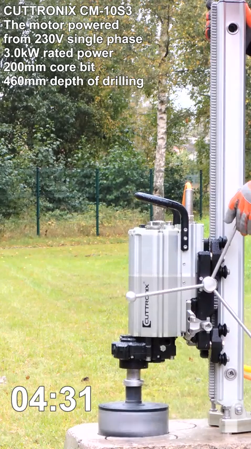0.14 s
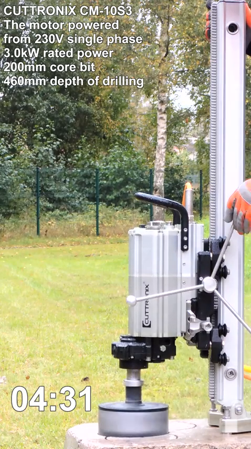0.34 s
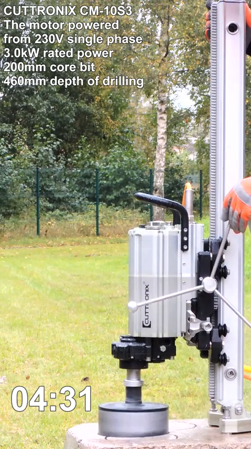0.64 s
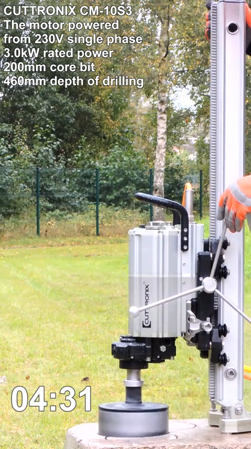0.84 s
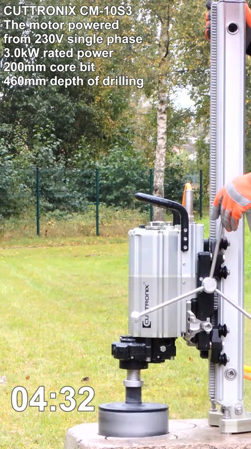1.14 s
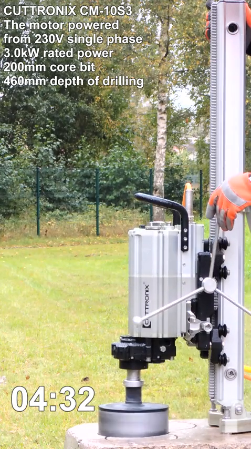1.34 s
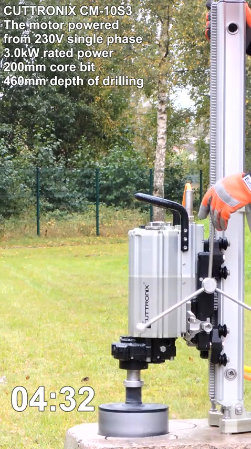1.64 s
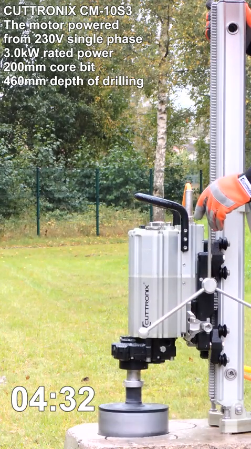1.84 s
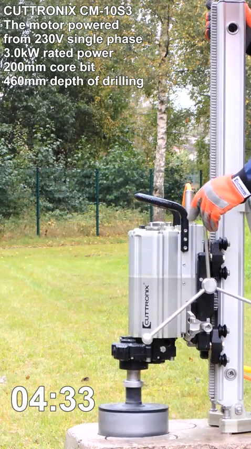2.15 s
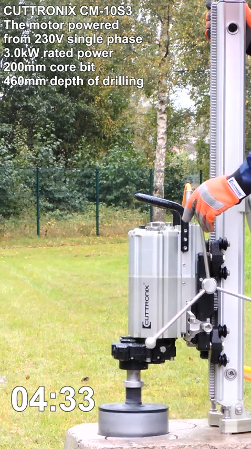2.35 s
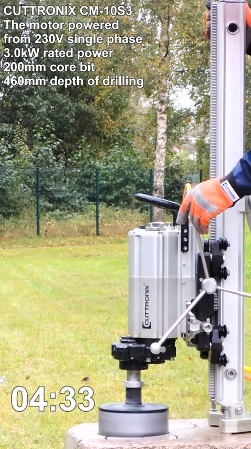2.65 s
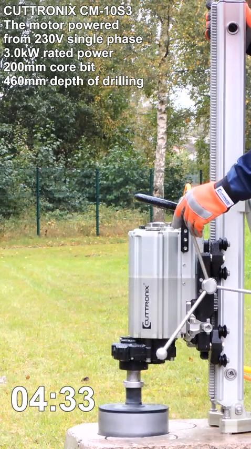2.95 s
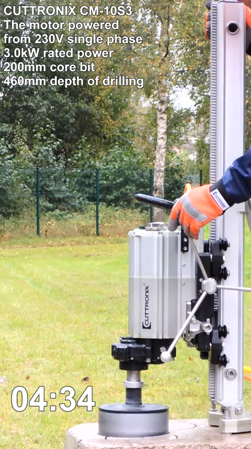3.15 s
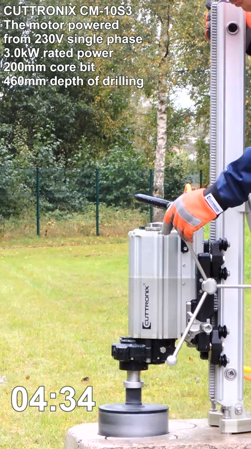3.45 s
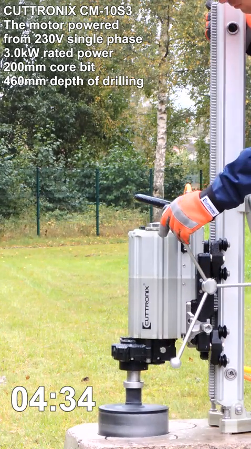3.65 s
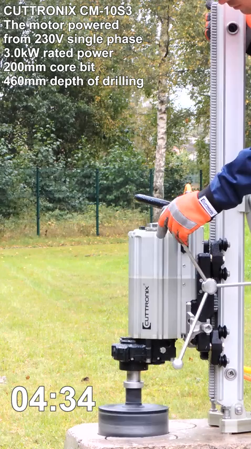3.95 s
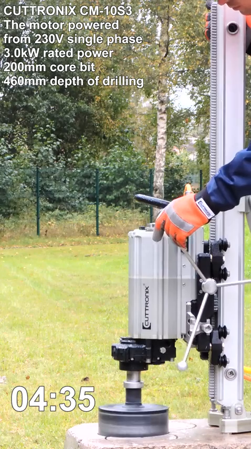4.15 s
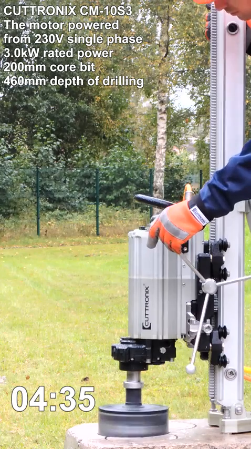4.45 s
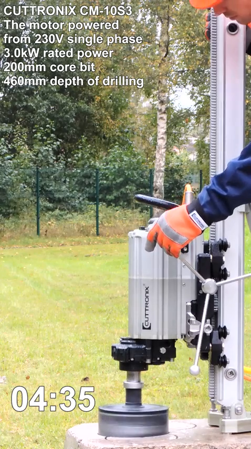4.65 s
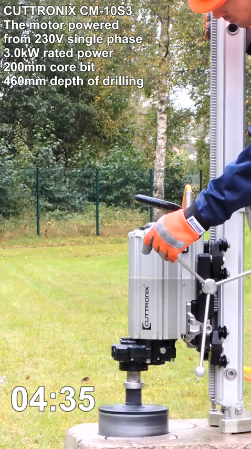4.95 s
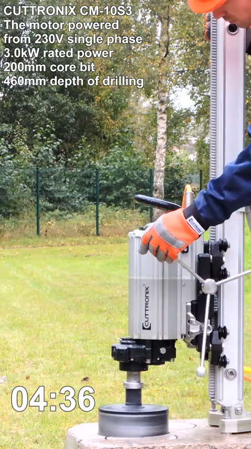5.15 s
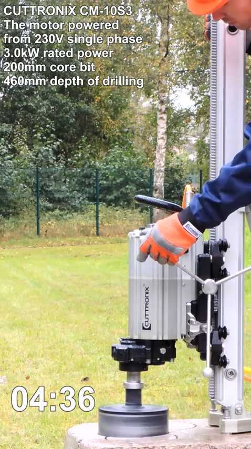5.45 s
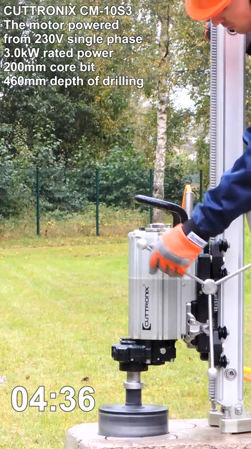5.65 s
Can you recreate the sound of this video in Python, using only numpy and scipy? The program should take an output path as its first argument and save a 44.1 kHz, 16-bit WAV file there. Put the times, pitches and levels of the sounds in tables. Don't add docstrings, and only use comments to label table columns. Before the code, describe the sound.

From 0 to about 5.8 seconds an electric core drill grinds concrete without pause, starting and ending mid-cut. The main sound is a dense, abrasive scrape: bright hissing grit over a hollow, metallic midrange and modest low rumble. It flutters about ten times a second with each barrel turn, the lower roughness partly repeating. A thin whine near 1.4 kHz, with close companion tones and faint gear whistles, rises slightly until about 1.6 s, sags by 3.5 s, then climbs to the end. Small rasps catch around 0.6 to 0.9 s, the sharpest at 0.8; the grinding eases briefly near 2 s. Scattered scratches and dull knocks follow at 2.3, 2.6, 3.2 and 4.8 s. From 5.3 to 5.6 s a quick cluster of woody, stony knocks rattles the rig, around a brighter surge at 5.45. Close, dry, outdoors, centered with slight treble width.

```python
import sys
import numpy as np
from scipy import signal
from scipy.fft import rfft, irfft
from scipy.io import wavfile
from scipy.ndimage import uniform_filter1d

SR = 44100
rng = np.random.default_rng(int(sys.argv[2]) if len(sys.argv) > 2 else 0)


def wav_out(sig):
    wavfile.write(sys.argv[1], SR, np.round(np.clip(np.atleast_2d(sig).T, -1, 1) * 32767).astype(np.int16))


def magnitude_from_level(level_db):
    exponent = np.asarray(level_db, float) / 20
    return 10 ** exponent


N = 256220
HOP = 128

# (frequency [Hz], level [dB per Hz])
SCRATCH_SPECTRUM = [(20, -22), (60, -24.5), (110, -21), (170, -20.5), (330, -18.5), (570, -22.5),
                    (800, -10.5), (1300, -7.5), (1800, -14), (2300, -12.5), (3300, -9.5), (6100, -4),
                    (9000, -1.38), (12000, -3)]
# (frequency [Hz], width [Hz], gain [dB])
RIG_RESONANCES = [(129, 35, 7), (162, 25, -3), (220, 105, 11.5), (310, 50, -3), (358, 18, -5),
                  (458, 216, 15.5), (594, 59, -7.5), (603, 30, 12.5), (679, 25, 3), (935, 60, -2),
                  (1022, 130, 6), (1333, 31, -4), (1490, 130, -3.5), (1640, 165, 11), (1997, 299, 8.7),
                  (2420, 173, 6.3), (2891, 600, 10.2), (3756, 270, 7.5), (4483, 560, 3.6),
                  (5406, 1188, 4.4), (6143, 268, -3.2), (6762, 75, 2.1), (7794, 429, 4.3),
                  (7813, 199, -5.8), (8190, 114, -2.6), (8617, 83, -2.1), (9812, 112, 2.8),
                  (10234, 276, 2.6), (10578, 128, 4), (1170, 70, 1), (1790, 60, -1.5), (3130, 70, 1.2),
                  (3290, 80, -2), (3420, 120, 1.2), (4030, 110, 2.2), (4720, 150, -1), (5000, 150, -1),
                  (5650, 70, 1.5), (6570, 110, 1.6), (6930, 130, -1.6), (11144, 787, 2.7), (11604, 90, 3.6)]
# (frequency [Hz], share [0-1])
TURN_REPEAT = [(80, .2), (150, .4), (280, .55), (390, .3), (550, .45), (900, .1), (1050, .2), (1500, .04),
               (2000, 0)]
# (frequency [Hz], level [dB])
PORT_DIFFERENCE = [(30, -9), (110, -16.5), (300, -29), (800, -31.5), (1150, -36), (1500, -25), (1800, -38),
                   (5000, -32), (5700, -64), (6300, -14.5), (8000, -13.5), (12000, -14.5)]
# (frequency [Hz], in step [ratio], quarter cycle late [ratio])
PORT_LEAN = [(60, -0.07, 0.032), (250, -0.015, 0.025), (6000, 0.0022, -0.0067), (6600, -.02, -0.17),
             (7600, -.08, -.15), (8300, -.05, -.04), (10200, -.04, -0.13), (11400, -0.061, 0)]


def grinding(t, turns):
    hz = np.fft.rfftfreq(N, 1 / SR)
    share = read(TURN_REPEAT, hz)
    fresh = np.sqrt(1 - share) * rfft(grit(spread_db=1.15))
    returning = np.sqrt(share) * rfft(groove(turns, memory=0.83))
    scrape = irfft(fresh + returning, N)
    side_scrape = grit(spread_db=-0.5)

    stft = dict(nperseg=512, noverlap=512 - HOP)
    band_hz, frame_s, z = signal.stft(np.array([scrape, side_scrape]), SR, **stft)
    z *= magnitude_from_level(loading(band_hz, frame_s, np.interp(frame_s, t, turns)))
    loaded = signal.istft(z, SR, **stft)[1][:, :N]
    total, apart = rfft(loaded)

    lean_hz, in_step, late = np.transpose(PORT_LEAN)
    lean = np.interp(hz, lean_hz, in_step + 1j * late)
    apart = apart * magnitude_from_level(read(PORT_DIFFERENCE, hz)) + total * lean
    colour_db = read(SCRATCH_SPECTRUM, hz)
    for centre_hz, width_hz, gain_db in RIG_RESONANCES:
        colour_db = colour_db + gain_db / (1 + (2 * (hz - centre_hz) / width_hz) ** 2)
    return magnitude_from_level(5.5) * irfft(np.array([total, apart]) * magnitude_from_level(colour_db), N)


def grit(spread_db):
    size_db = spread_db * rng.standard_normal(N // 8 + 1).repeat(8)[:N]
    return evened(rng.standard_normal(N) * magnitude_from_level(size_db))


def groove(turns, memory):
    steps = 2048
    fresh = rng.standard_normal((90, steps))
    rings = signal.lfilter([1], [1, -np.clip(memory, 0, .98)], fresh, axis=0)[20:]
    rough = np.interp(turns * steps, np.arange(rings.size), evened(rings).ravel())
    return rough * np.sqrt(steps * 10 / SR)


# (time [s], level [dB])
FEED_FORCE = [(0.0, -18), (0.11, -18.5), (0.52, -21), (0.605, -18), (0.625, -19.5), (0.71, -18),
              (0.74, -18.5), (1.7, -17.5), (1.72, -17.5), (1.97, -22), (2.12, -19), (3.67, -20),
              (3.72, -17), (3.88, -18.5), (4.51, -17), (5.31, -21), (5.42, -18), (5.81, -19)]
# (frequency [Hz], share [0-1])
FEED_REACH = [(300, 0.84), (1400, 0.33), (3400, 0.75), (7500, 0.66)]
# (multiple of the turn [1], depth [dB], phase [rad])
BIT_WOBBLE = [(1, 2, 0.8), (2, 0.98, -0.7), (3, 1, 3.5), (4, 1.1, -1)]
# (frequency [Hz], share [0-1])
WOBBLE_REACH = [(200, 0.26), (1500, 0.34), (3000, 0.11), (6000, 0.32), (12000, 0.42)]
# (time [s], level change [dB], length [s])
STONE_BITES = [(0.107, 1.5, 0.036), (0.713, 2, 0.037), (0.864, 1.5, 0.014), (1.748, -2.5, 0.045),
               (1.96, 0, 0.043), (3.59, -0.5, 0.029), (4.738, 1.5, 0.014), (5.02, -1.5, 0.021),
               (5.432, 2, 0.017), (5.455, 2, 0.0057), (5.477, -1, 0.015), (0.56, -0.5, 0.0073),
               (0.591, -3, .003), (0.724, -2, .003), (0.971, -2, .003), (4.784, -2, 0.0044),
               (5.003, -0.5, .005)]
# (time [s], length [s], frequency [Hz], width [Hz], level change
# [dB])
RANGE_SWELLS = [(0.05, 0.039, 1000, 410, 3), (.15, 0.16, 250, 60, -7), (.25, .2, 4000, 900, 0.5),
                (.7, 0.066, 1000, 100, 1), (0.714, .02, 2700, 400, -3), (1.05, 0.15, 250, 60, 1),
                (1.422, 0.18, 470, 100, -3), (1.5, .08, 81, 80.5, -4), (1.85, 0.066, 60, 40, 8),
                (1.853, 0.093, 250, 60, -6), (2.15, .05, 70, 40, -4), (2.152, .05, 6000, 1200, 1.5),
                (2.55, 0.12, 240, 80, -5), (2.9, 0.066, 300, 300, 1.5), (3, 0.16, 1000, 200, 1.5),
                (3.15, 0.11, 130, 40, -6), (3.45, 0.049, 500, 120, 0.5), (3.55, 0.15, 2700, 600, -1),
                (3.6, .08, 80.4, 60, -5), (4.2, .1, 950, 200, 0), (4.62, .05, 120, 40, -10),
                (4.8, .1, 135, 40, 3), (4.75, 0.078, 6200, 1200, -1), (5.05, 0.16, 550, 200, -2),
                (5.25, .08, 65, 40, 4), (5.7, .1, 40, 40, 4), (5.45, 0.07, 2290, 600, 0.5),
                (.4, .4, 474, 60, 3), (.75, .12, 4200, 900, 0), (1.5, 0.18, 1030, 60, 1.5),
                (2.905, 0.14, 1690, 80, 4), (4.15, 0.46, 1250, 89, 3.5), (4.297, 0.11, 3740, 150, 2.5),
                (4.45, 0.35, 1600, 120, 1), (4.738, 0.02, 4570, 300, 2), (5.72, 0.3, 1600, 200, 1.5),
                (5.42, 0.21, 980, 90, 5), (5.448, 0.056, 230, 80, 6), (5.46, 0.043, 500, 120, 0),
                (5.45, 0.033, 6500, 1500, 0),
                (0.76, .3, 720, 50, 2), (2.9, .15, 470, 60, -1), (1.5, 0.061, 4500, 1300, -1),
                   (.73, .1, 1200, 120, -3), (3.12, .12, 1900, 200, -3), (4.4, 0.13, 1400, 230, 0.5),
                   (5.45, .04, 700, 150, -0.5), (4.3, 0.4, 310, 33, 3), (1, .2, 310, 45, 3),
                   (2.65, .12, 12000, 1300, 0), (.1, .12, 5100, 800, -1), (4.2, .12, 400, 35, -2),
                   (.5, .25, 710, 53, -0.5), (2.34, .2, 3300, 500, -0.5), (3.1, 0.13, 430, 37, 0),
                   (5.15, 0.074, 130, 54, -6), (2.1, .08, 81, 44, 2)]
# (frequency [Hz], spread [dB])
CHANCE_FLARES = [(300, .3), (2000, .6), (4000, 1.2), (9000, 1.5)]


def loading(hz, s, turns):
    feed_db = np.interp(s, *np.transpose(FEED_FORCE))
    tilt_db = np.outer(read(FEED_REACH, hz), feed_db - feed_db.mean())
    wobble_db = sum(depth_db * np.cos(2 * np.pi * k * turns + phase + 0.25 * drift(0.24, len(s), HOP))
                    for k, depth_db, phase in BIT_WOBBLE)
    bites_db = sum(extra_db * bell(s, at, length) for at, extra_db, length in STONE_BITES)
    swells_db = sum(extra_db * np.outer(bell(hz, centre_hz, width_hz), bell(s, at, length))
                    for at, length, centre_hz, width_hz, extra_db in RANGE_SWELLS)
    flares_db = read(CHANCE_FLARES, hz)[:, None] * patches(tilt_db.shape, bins=2, frames=14)
    chatter_db = 0.68 * patches(tilt_db.shape, bins=12, frames=8)
    chatter_db += 0.71 * patches(tilt_db.shape, bins=45, frames=2)
    steady_db = feed_db.mean() + tilt_db + bites_db + swells_db + rasps(hz, s)
    return steady_db + read(WOBBLE_REACH, hz)[:, None] * wobble_db + flares_db + chatter_db


# (time [s], level change [dB], centre [Hz], decay [s])
SEGMENT_RASPS = [(.6155, 4, 5450, .015), (.632, 7, 3700, .012), (.695, 5, 4800, .012),
                 (.815, 12, 3280, .01), (.872, 0, 2800, .012), (1.9704, -1, 4270, .015),
                 (2.1655, 2.5, 5600, 0.016), (2.2967, 4, 5290, .012), (2.6454, 6.5, 2990, .012),
                 (2.7661, 1, 2410, .012), (2.92, 5, 3000, .01), (3.0614, 0.5, 5740, .012),
                 (3.3822, -2, 5410, .012), (3.707, 3, 5520, .015), (4.0377, 2, 3730, .012),
                 (4.4473, 4, 5660, .012), (4.789, -1, 3810, 0.011), (5.05, -1, 3800, .012),
                 (5.3428, 6, 2450, .01), (5.3966, 3, 5280, 0.011), (5.444, 0, 1700, .015),
                 (5.454, 3, 3500, 0.0092), (5.675, 1, 4910, .012), (5.7144, 4, 2890, 0.016),
                 (5.7912, -1, 3850, .012)]


def rasps(hz, s):
    rise_s, relative_width = .003, 0.17
    total_db = 0
    for at, extra_db, centre_hz, decay_s in SEGMENT_RASPS:
        rise = np.clip((s - at) / rise_s + 1, 0, 1)
        fall = np.exp(-np.maximum(s - at, 0) / decay_s)
        total_db = total_db + extra_db * np.outer(bell(hz, centre_hz, relative_width * centre_hz), rise * fall)
    return total_db


# (time [s], speed [rev/s])
SPINDLE_SPEED = [(0, 9.675), (.4, 9.7), (.6, 9.8), (1, 9.88), (1.2, 10.044), (1.6, 10.144), (2.2, 10.079),
                 (2.8, 9.895), (3.4, 9.63), (3.6, 9.606), (3.8, 9.656), (4, 9.829), (4.4, 9.901),
                 (4.6, 9.831), (5, 9.849), (5.2, 10.079), (5.4, 10.204), (5.81, 10.294)]


def spindle_rev_s(t):
    return np.interp(t, *np.transpose(SPINDLE_SPEED))


# (level at usual speed [dB rms], gain per 1% sag [dB], slow wavering [dB])
MOTOR_WHINE = [
    (-44.5, .5, 1.2),
    (-46.5, 2.3, 1.2),
    (-47, -.8, 2.5),
]
# (multiple of the turn [1], level at middle depth [dB rms], change as the bit sinks [dB/s])
GEAR_TONES = [(7.8, -68, 0), (13, -61, 0), (20.8, -57.5, 1), (24, -56.5, .7), (25, -57, -1.4),
              (26, -54.5, .5), (28, -50.5, 0), (35, -62.5, 2.5), (39, -47.5, 0), (42, -60, 0), (45, -55, 0),
              (48, -56, 0), (52, -57, -1.8), (62, -59.5, 0), (79, -58, 0), (90, -54, 0)]
# (multiple of the turn [1], level [dB rms], loudest time [s], spread [s])
DEPTH_TONES = [(95, -42.5, 1.6, 1.5), (98, -48, 2.5, .4), (103, -48, 1.6, .5), (101.9, -45, 2.0, .8),
               (42, -50, 2.7, .6), (45, -48, .9, 1.0)]


def motor(t, turns):
    whine_order, mains_ripple_hz = 140.4, 100
    usual_rev_s, middle_depth_s = 9.9, 2.9
    most_gain_db, gear_sag_db = 3.5, .9
    slow = t[::HOP]
    sag_percent = 100 * (1 - spindle_rev_s(slow) / usual_rev_s)

    whine = 0
    for k, (db, per_sag_db, waver_db) in enumerate(MOTOR_WHINE):
        level_db = db + per_sag_db * sag_percent + waver_db * drift(0.96, len(slow), HOP)
        cycles = whine_order * turns + k * mains_ripple_hz * t + rng.random()
        whine = whine + np.interp(t, slow, magnitude_from_level(level_db)) * np.sin(2 * np.pi * cycles)

    levels = []
    for _, db, sink_db_s in GEAR_TONES:
        depth_db = np.minimum(sink_db_s * (slow - middle_depth_s), most_gain_db)
        levels.append(magnitude_from_level(db + depth_db - gear_sag_db * sag_percent + 1.5 * drift(2, len(slow), HOP)))
    for _, db, at, spread_s in DEPTH_TONES:
        levels.append(magnitude_from_level(db + drift(2, len(slow), HOP)) * bell(slow, at, spread_s))

    twist_rad = np.interp(t, slow, .004 * drift(4.4, len(slow), HOP))
    gears = 0
    for (k, *_), level in zip([*GEAR_TONES, *DEPTH_TONES], levels):
        tone = np.sin(2 * np.pi * (k * turns + rng.random()) + k * twist_rad)
        gears = gears + np.interp(t, slow, level) * tone
    return np.sqrt(2) * (magnitude_from_level(-.3) * whine + magnitude_from_level(-.5) * gears)


# (time [s], resonance [Hz], peak level [dB], length [s])
STONE_KNOCKS = [(.105, 450, -32, 0.014), (2.34, 215, -39, 0.03), (3.212, 445, -33, 0.02),
                (3.346, 200, -39, 0.048), (4.761, 450, -35, 0.0084), (5.302, 250, -29, 0.0047),
                (5.341, 990, -25, 0.0049), (5.392, 1030, -24.5, 0.0045), (5.534, 960, -28, 0.0061),
                (5.385, 470, -33, 0.0074), (5.4, 201, -32, 0.0045), (5.432, 220, -41, 0.0083),
                (5.439, 960, -23, 0.0036), (5.456, 500, -27, 0.0053), (5.459, 1060, -36, 0.0063),
                (5.557, 1050, -30, 0.011)]


def knocks(t):
    return sum(magnitude_from_level(peak_db) * bell(t, at, length) * np.sin(2 * np.pi * (hz * t + rng.random()))
               for at, hz, peak_db, length in STONE_KNOCKS)


def evened(x):
    return x / np.sqrt(np.mean(x ** 2) + 1e-20)


def read(points, hz):
    f, value = np.transpose(points)
    return np.interp(np.log(hz + 1), np.log(f + 1), value)


def drift(per_s, count, step=1):
    pole = np.exp(-2 * np.pi * per_s * step / SR)
    return evened(signal.lfilter([1], [1, -pole], rng.standard_normal(count)))


def bell(x, centre, spread):
    return np.exp(-.5 * ((x - centre) / spread) ** 2)


def patches(shape, bins, frames):
    smooth = uniform_filter1d(rng.standard_normal(shape), bins, axis=0)
    return evened(uniform_filter1d(smooth, frames, axis=1))


def scene():
    t = np.arange(N) / SR
    turns = np.cumsum(spindle_rev_s(t)) / SR
    total, apart = grinding(t, turns)
    total = total + motor(t, turns) + knocks(t)
    return np.array([total + apart, total - apart])


def low_pass(x):
    return signal.sosfilt(signal.butter(12, 12960, fs=SR, output="sos"), x)


def record(dry):
    lowpass = signal.firwin(1535, 11950, window=("kaiser", 9), fs=SR)
    limited = signal.oaconvolve(dry, lowpass[None], "same")
    return low_pass(limited)


dry = scene()
out = record(dry)
wav_out(out)
```